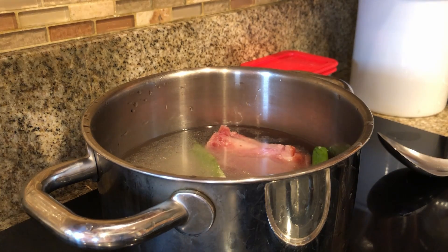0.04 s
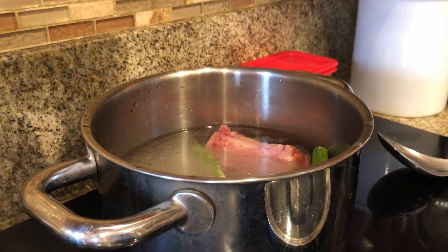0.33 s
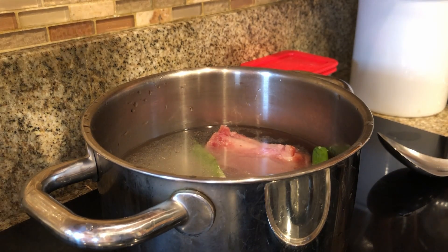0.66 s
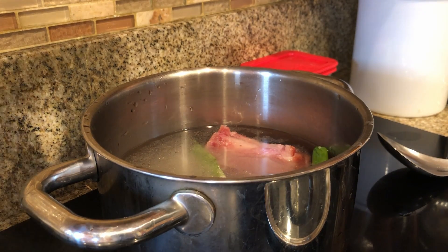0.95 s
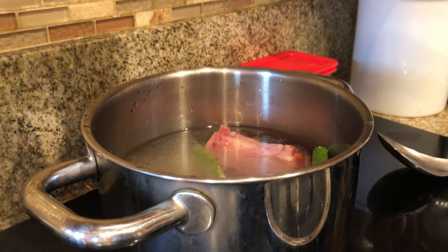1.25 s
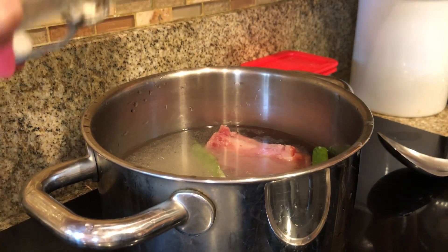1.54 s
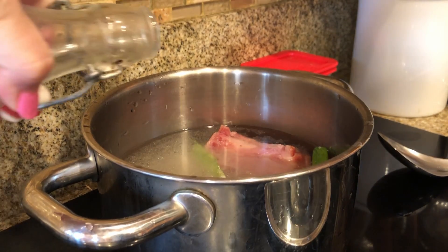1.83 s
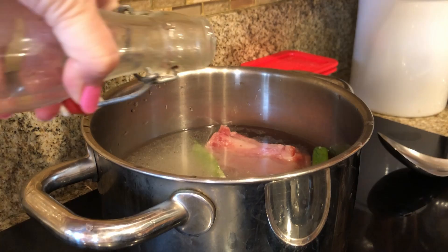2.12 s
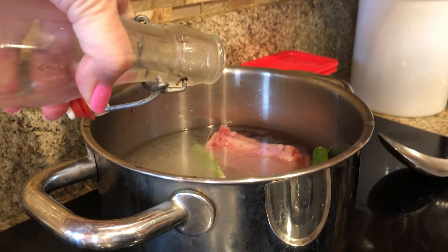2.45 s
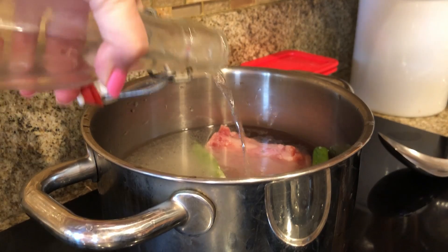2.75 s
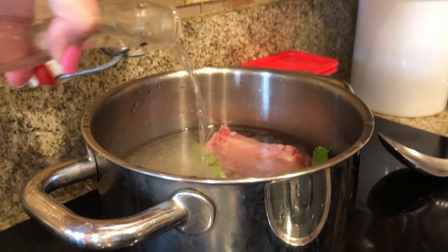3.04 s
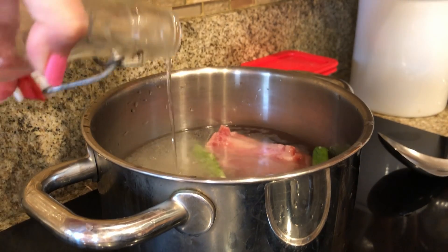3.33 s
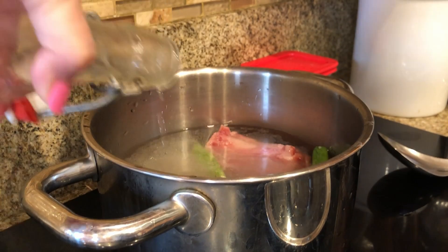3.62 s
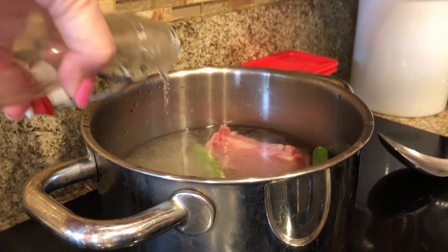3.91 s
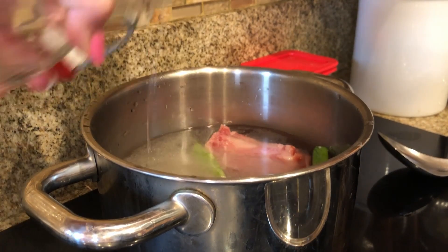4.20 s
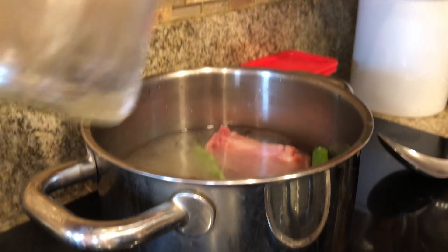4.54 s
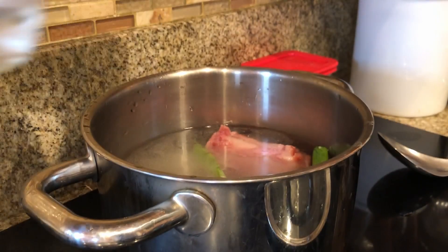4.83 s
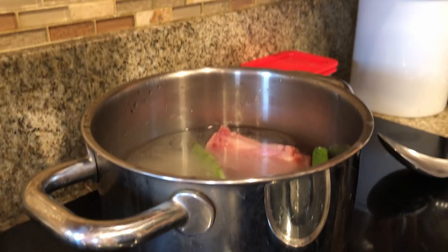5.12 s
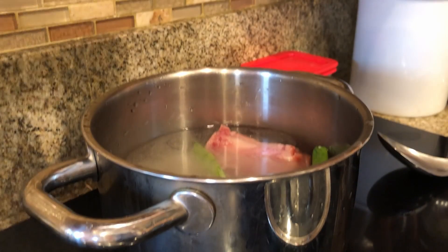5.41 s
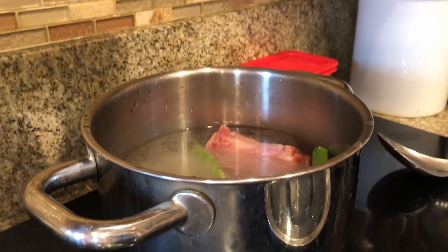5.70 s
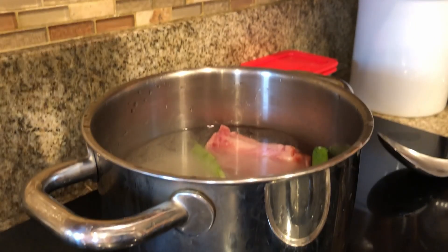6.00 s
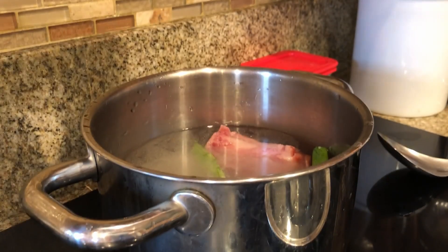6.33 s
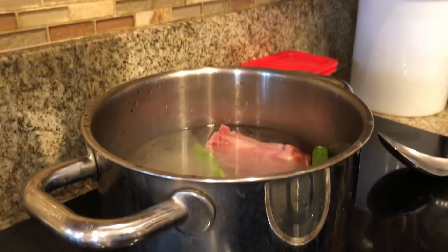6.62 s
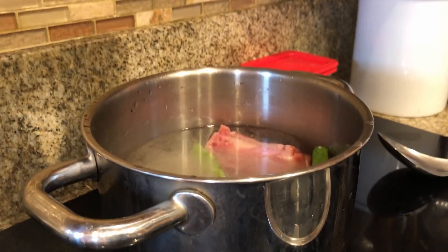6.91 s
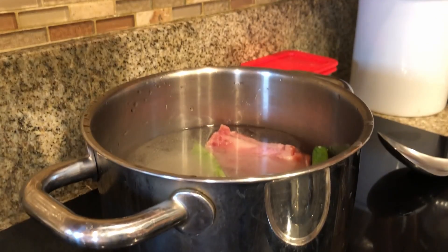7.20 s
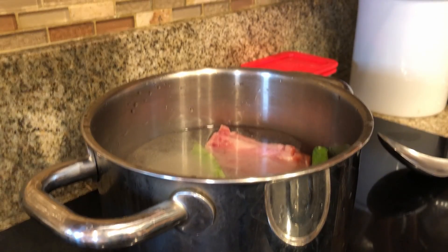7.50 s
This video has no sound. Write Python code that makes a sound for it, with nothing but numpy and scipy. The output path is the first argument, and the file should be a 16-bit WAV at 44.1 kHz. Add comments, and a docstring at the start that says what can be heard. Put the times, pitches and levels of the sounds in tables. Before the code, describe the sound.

Heard close in a small kitchen, a pot on the stove crackles and spits continuously over soft bubbling and a faint low rumble. Liquid briefly trickles in from a glass bottle, making a few small plinks. The sharp ticks then thin out into a smoother fizz, the bottle's wire clasp gives two metallic clicks, and the glass knocks and clinks down on a stone counter, settling with soft bumps.

```python
"""Trapped water spits and crackles in quick flurries as a steel pot heats on a glass hob:
tiny bubbles burst into a sizzle, droplets flash to steam and larger bubbles snap.
The water bubbles softly, and plinks and gurgles as a thin stream pours in from a swing-top glass bottle.
The wire bail clicks, then the bottle is set down on the stone counter and clinks.
The hob rumbles low underneath. Small kitchen, close perspective."""
import sys
import numpy as np
from scipy import signal
from scipy.fft import rfft, irfft
from scipy.io import wavfile

SR = 44100
rng = np.random.default_rng(int(sys.argv[2]) if len(sys.argv) > 2 else 0)


def store_pcm(level_fs):
    """Save levels as 16-bit WAV."""
    pcm = np.round(np.clip(level_fs, -1, 1) * 32767).astype(np.int16)
    wavfile.write(sys.argv[1], SR, np.atleast_2d(pcm).T)


N = 332997
TIME = np.arange(N) / SR

# Levels are relative: each layer sets its own gain on top.
# The ride of the hob's rumble. Each row: time in seconds, level in dB.
RUMBLE_RIDE = [(0.0, -69), (0.46, -58.5), (0.86, -68), (1.07, -52), (1.28, -70), (1.7, -56.5),
               (1.89, -65.5), (2.92, -65.5), (3.3, -60.5), (4.02, -67), (5.0, -62.5), (5.66, -67.5),
               (5.95, -55), (6.31, -64.5), (6.58, -59), (7.55, -57.5)]
# The rumble's tone. Each row: frequency in Hz, level in dB.
RUMBLE_EQ = [(20, -1.5), (40, 2.5), (70, 0.5), (130, -2.5), (200, -9.5), (300, -3.5), (430, -14.5),
             (1000, -21), (3000, -22.5), (16000, -22)]

# The wire bail hits the bottle neck. Each row: start in seconds, level in dB, hardness from 0 to 1.
BAIL_HITS = [(0.564, -19, 0.8), (0.599, -22.5, 1), (5.4241, -6.5, 0), (6.0881, -3.5, 0.97)]
# The wire's ring. Each row: pitch in Hz, dB when flicked softly, dB when snapped hard, t60 in seconds.
BAIL_RING = [(868, -47, -25, .05), (5300, -15, -26, .025), (5800, 1.5, -20, .035), (6660, -24, -18, .065),
             (9324, -18, -20, .05), (9810, -34, -21, .07), (11190, -22, -16, .055), (11370, -9, -10, .055),
             (12120, -17, -21, .04), (13270, -16, -20, .05), (13750, -19, -24, .04),
             (14220, -18, -21, .035)]
# The bail's bright crack. Each row: frequency in Hz, level in dB.
BAIL_CRACK_EQ = [(300, -18), (1500, -19.5), (2500, -4), (3300, -12.5), (5200, -11), (6700, -6),
                 (7900, -8.5), (9400, 1.5), (10200, -4), (11200, 3), (13000, -2.5), (15500, -12)]

# Glass clinks. Each row: start in seconds, level in dB, contact point from 0 (foot) to 1 (side).
BOTTLE_CLINKS = [(6.7652, -11, 0), (6.8755, -11.5, 0.71), (7.0545, -21.5, 0.77)]
# The glass ring. Each row: pitch in Hz, dB struck at the foot, dB struck on the side, t60 in seconds.
BOTTLE_RING = [(3928, -22, -1, .17), (4626, -1.5, -3, .2), (4680, -10, -8, .19), (4974, -17, -30, .12),
               (5375, -19, -28, .1), (6698, -15, -11, .11), (6840, -8, -20, .1), (7784, -18, -31, .09),
               (9012, -16, -27, .09), (9437, -3, -18, .095), (10380, -14, -28, .1), (12840, -13, -29, .07)]
# Knocks on the counter. Each row: start in seconds, level in dB, softness from 0 to 1.
COUNTER_KNOCKS = [(.544, -42, 0), (.566, -59, 0), (0.601, -42.5, 0), (3.797, -45, 0), (6.766, -9, 0.05),
                  (6.825, -26.5, 0.3), (6.873, -25, 0), (7.054, -31, 0.16), (7.185, -40.5, 1),
                  (7.2344, -21.5, 1), (7.2541, -17, 0.8), (7.343, -34, 0.94)]
# The counter under the bottle. Each row: pitch in Hz, dB hit hard, dB hit softly, t60 in seconds.
COUNTER_RING = [(775, -11, -7, .07), (870, -5, -6, .09), (1068, -7, -14, .09), (1280, -13, -24, .07),
                (1495, -5, -14, .07), (1630, -4, -12, .065), (1757, 0, -1, .05), (2100, -7, -13, .04),
                (2260, -6, -15, .04), (2690, -6, -21, .04), (3250, -12, -19, .035)]
# The crack of a knock. Each row: frequency in Hz, level in dB.
KNOCK_EQ = [(100, -42), (350, 0), (900, -11), (1800, 7.5), (2700, 0.5), (3600, 0.5), (7000, -8.5),
            (16000, -11.5)]
# The hollow thock of a soft contact. Each row: frequency in Hz, level in dB.
THOCK_EQ = [(200, -29), (600, -23.5), (850, 13), (1280, -18.5), (1740, -4), (2200, -72), (3400, -52),
            (8000, -38)]
# Dull handling bumps. Each row: start in seconds, level in dB, t60 in seconds.
HANDLING_BUMPS = [(0.585, -42, 0.1), (4.44, -39.5, 0.24), (4.847, -48.5, 0.19), (6.768, -40, 0.51),
                  (6.826, -35, 0.07), (6.955, -40.5, 0.12), (7.253, -38.5, 0.27)]
# A bump's dark tone. Each row: frequency in Hz, level in dB.
BUMP_EQ = [(30, -14), (70, -1.5), (130, -2), (200, -0.5), (300, -6), (600, -6.5), (1200, -13), (4000, -61)]

# The ride of the water's bubbling. Each row: time in seconds, level in dB.
GURGLE_RIDE = [(0, -74.5), (1, -69.5), (2.6, -71), (2.85, -56), (3.3, -65.5), (4.4, -64.5), (7.55, -56)]
# Short pitched rings: the wire bail's ping at 0.6 s, then single bubbles in the water.
# Each row: start in seconds, level in dB, opening pitch in Hz.
SHORT_RINGS = [(.602, -33.5, 2080), (2.25, -41.5, 650), (2.799, -42.5, 870), (2.825, -44, 1500),
               (2.911, -40.5, 2290), (2.919, -36, 2630), (2.959, -42, 2980), (2.975, -35.5, 5570),
               (3.003, -37, 5070), (3.003, -38, 3050), (3.116, -36, 4760), (3.287, -45, 1570),
               (4.103, -42, 1840)]

# Larger bubbles bursting. Each row: start in seconds, level in dB.
BUBBLE_SNAPS = [(0.6319, -12), (0.7032, -15), (0.9352, -12), (1.1347, -16), (1.2016, -11), (1.5338, -14),
                (1.6027, -15), (1.7897, -14), (1.8708, -9), (1.9608, -16), (1.9898, -19), (2.2237, -10),
                (2.371, -4), (2.5919, -15), (2.6822, -9), (3.3178, -12), (3.3926, -14), (3.7957, -9),
                (4.1269, -11), (4.326, -12), (4.7799, -13), (6.1798, -9)]
# Droplets flashing to steam. Each row: start in seconds, level in dB, t60 in seconds.
STEAM_SPITS = [(0.031, -40, 0.057), (0.265, -36.5, 0.17), (0.395, -35, 0.063), (0.537, -28, 0.3),
               (0.562, -27, 0.06), (0.703, -31.5, 0.39), (0.901, -34.5, 0.36), (0.972, -29.5, 0.16),
               (1.05, -28, 0.1), (1.199, -27.0, 0.18), (1.239, -29, 0.34), (1.653, -32.5, 0.14),
               (1.69, -35, 1.1), (1.862, -33, 0.27), (1.99, -38.5, 2), (2.222, -30, 0.4),
               (2.311, -31, 0.33), (2.591, -35.5, 0.099), (2.627, -28, 0.72), (2.834, -28, 0.084),
               (3.133, -31.5, 0.48), (3.39, -27.5, 0.33), (3.543, -33.5, 0.29), (3.675, -33, 0.16),
               (3.792, -32, 0.29), (4.005, -24.0, 0.079), (4.039, -25, 0.24), (4.324, -25.5, 0.34),
               (4.448, -29.5, 0.2), (4.495, -25.5, 0.1), (4.771, -32.5, 0.59), (4.849, -21.5, 0.14),
               (5.101, -23, 0.075), (5.219, -29, 0.55), (5.392, -32.5, 0.63), (5.72, -35, 0.44),
               (5.776, -24, 0.24), (6.003, -25, 0.055), (6.028, -30, 0.7), (6.178, -28, 0.065),
               (6.329, -31.5, 0.15), (6.419, -23.5, 0.24), (6.517, -28.5, 0.08), (6.644, -32.5, 0.16),
               (6.954, -23, 0.2), (7.378, -25, 0.37)]
# The bed of sizzle under the spits. Each row: time in seconds, level in dB.
SIZZLE_RIDE = [(0.0, -53), (0.13, -55), (0.5, -43.5), (0.68, -44), (0.9, -37), (1.17, -45), (1.4, -41.5),
               (1.97, -53.0), (2.4, -41), (2.56, -42.5), (2.8, -36.5), (3.1, -40.5), (3.65, -37),
               (4.6, -41.0), (5.2, -42), (5.35, -36), (6.3, -41.5), (7.55, -42)]
# How far bubble ticks stand out; the sputter partly follows. Each row: time in seconds, level in dB.
TICK_RIDE = [(0, 1), (.7, 1), (4.62, -0.5), (5.6, -17.5), (7.55, -54)]
# The bright tone of sizzle and snaps. Each row: frequency in Hz, level in dB.
CRACKLE_EQ = [(250, -21.5), (450, -17.5), (850, -11.5), (1200, -16), (2200, -14.5), (3800, -13.5),
              (4700, -9), (5600, -6.5), (7100, -4), (8400, -6), (9900, -0.5), (12000, 0.9), (13800, 0.5),
              (15500, -4)]


def from_db(db):
    return 10 ** (np.asarray(db) / 20)


def ride(rows):
    """A fader move: rows of (seconds, dB) joined by straight lines."""
    return np.interp(TIME, *np.transpose(rows))


def add(out, s, sound):
    """Mix a sound in at s seconds."""
    start = min(max(round(s * SR), 0), N)
    out[start:start + len(sound)] += sound[:N - start]


def colour(x, eq, size=4096):
    """Shape a sound with a minimum-phase EQ of unit energy, so nothing rings ahead of an attack."""
    hz, db = np.transpose(eq)
    gain = from_db(np.interp(np.log(np.fft.rfftfreq(size, 1 / SR) + 1), np.log(hz), db))
    cepstrum = irfft(np.log(gain))[:size // 2]
    pulse = irfft(np.exp(rfft(2 * cepstrum, size)))
    return signal.oaconvolve(x, pulse / np.linalg.norm(pulse))[:N]


def noise(eq):
    """Coloured noise, rms near 1."""
    return colour(rng.standard_normal(N), eq)


def swell(rise, t60):
    """One second of envelope: a straight attack, then an exponential decay."""
    t = TIME[:SR]
    return np.minimum(t / rise, 1) * from_db(-60 * np.maximum(t - rise, 0) / t60)


def bursts(rows):
    """Envelope of events whose powers sum. Each row: start, dB, rise, t60, with times in seconds."""
    power = np.zeros(N)
    for s, db, rise, t60 in rows:
        add(power, s, (from_db(db) * swell(rise, t60)) ** 2)
    return np.sqrt(power)


def grains(per_s, spread_db):
    """Random clicks of uneven size, mean power near 1 at any rate."""
    sizes = from_db(spread_db * np.minimum(rng.exponential(1, N), 4))
    sizes /= np.sqrt(np.mean(sizes ** 2))
    chance = np.minimum(per_s / SR, 1)
    return sizes * rng.choice([-1, 1], N) * (rng.random(N) < chance) / np.sqrt(chance)


def strike(hits, modes, rise):
    """Each hit rings every mode, blending between two ways of striking."""
    out = np.zeros(N)
    for s, db, blend in hits:
        for hz, first_db, second_db, t60 in modes:
            tone = np.sin(2 * np.pi * (hz * TIME[:SR] + rng.random()))
            gain = from_db(db + first_db + blend * (second_db - first_db))
            add(out, s, gain * swell(rise, t60) * tone)
    return out


def bubbles(per_s, spread_db, low_hz, high_hz, cycles, count):
    """A cloud of bubbles in `count` sizes, each dying by 60 dB over `cycles` cycles."""
    out = np.zeros(N)
    for hz in np.geomspace(low_hz, high_hz, count):
        decay = from_db(-60 * hz / (cycles * SR))
        angle = 2 * np.pi * hz / SR
        gain = np.sqrt((1 - decay ** 2) / 2)
        kicks = grains(per_s / count, spread_db) + 1e-18 * TIME  # the tiny ramp avoids denormals
        out += signal.lfilter([gain, 0, -gain], [1, -2 * decay * np.cos(angle), decay ** 2], kicks)
    return out / np.sqrt(count)


def hob_rumble(gain_db=4, waver_db=2, wavers_per_s=9):
    """The hob's low end swells, sinks and wavers."""
    waver = np.interp(TIME * wavers_per_s, np.arange(400), rng.standard_normal(400))
    return from_db(ride(RUMBLE_RIDE) + gain_db + waver_db * waver) * noise(RUMBLE_EQ)


def kitchen(x, t60, wet_db=-15.5):
    """Close walls return a short, dense tail."""
    tail = swell(.016, t60) * rng.standard_normal(SR)
    return x + from_db(wet_db) * signal.oaconvolve(x, tail / np.linalg.norm(tail))[:N]


def wire_bail(soft_crack_db=-12, hardness_db=9):
    """The wire rings briefly against the neck; a harder snap brings more bright crack."""
    crack = bursts([(s, db + soft_crack_db + hardness_db * hard, .0022, .036)
                    for s, db, hard in BAIL_HITS])
    return strike(BAIL_HITS, BAIL_RING, rise=.0028) + crack * noise(BAIL_CRACK_EQ)


def bottle(crack_db=-1, thock_db=2):
    """Glass meets stone: a hard crack or a soft thock, the ring of counter and glass, a dull bump."""
    crack = bursts([(s, db + crack_db - 8 * soft, .002, .04) for s, db, soft in COUNTER_KNOCKS])
    thock = bursts([(s, db + thock_db - 12 * (1 - soft), .0015, .024) for s, db, soft in COUNTER_KNOCKS])
    contact = crack * noise(KNOCK_EQ) + thock * noise(THOCK_EQ)
    counter = from_db(-4) * strike(COUNTER_KNOCKS, COUNTER_RING, rise=.00057)
    bump = bursts([(s, db, .006, t60) for s, db, t60 in HANDLING_BUMPS]) * noise(BUMP_EQ)
    glass = strike(BOTTLE_CLINKS, BOTTLE_RING, rise=.00095)
    return glass + contact + counter + bump


def gurgle():
    """Water bubbles softly as it boils throughout, and gurgles more while the stream pours in."""
    level = from_db(ride(GURGLE_RIDE))
    per_s = 400 * level / from_db(-63)
    return level * bubbles(per_s, spread_db=3.8, low_hz=652, high_hz=5330, cycles=26, count=16)


def plinks(gain_db=1.1, rise=.00072, t60=.037, climb_per_s=1.1):
    """Short rings that climb in pitch: one ping of the bail, then bubbles nearing the surface."""
    out = np.zeros(N)
    for s, db, hz in SHORT_RINGS:
        pitch = hz * (1 + climb_per_s * np.minimum(TIME[:SR], t60))
        tone = np.sin(2 * np.pi * np.cumsum(pitch) / SR)
        add(out, s, from_db(db + gain_db) * swell(rise, t60) * tone)
    return out


def snaps(gain_db=3.5, low_cut_hz=1800, delay_s=.0012):
    """A larger bubble bursts with one thin crack, scattered briefly by the pot wall."""
    clicks = np.zeros(N)
    scatter = from_db(-11) * swell(.0001, .002) + from_db(-24) * swell(.001, .018)
    for s, db in BUBBLE_SNAPS:
        crack = scatter * rng.standard_normal(SR)
        crack[0] = 1  # the direct crack leads, the scatter follows
        add(clicks, s + delay_s, from_db(db + gain_db) * crack)
    low_cut = signal.butter(1, low_cut_hz, "high", fs=SR, output="sos")
    return colour(signal.sosfilt(low_cut, clicks), CRACKLE_EQ)


def sputter(per_s=22, level_db=7, spread_db=8.5, rise=.006, t60=.027, tick_follow=.36):
    """Envelope of small random spits, relative to the sizzle bed; they recede as the ticks fade."""
    gap_draws, level_draws = rng.random((400, 2)).T
    starts = np.cumsum(-np.log(1 - gap_draws)) / per_s
    levels = level_db + spread_db * (2 * level_draws - 1)
    envelope = bursts([(s, db, rise, t60) for s, db in zip(starts, levels) if s < TIME[-1]])
    return envelope * from_db(tick_follow * ride(TICK_RIDE))


def spit_onset(s, reach_s=.008, snapped_rise=.0005, free_rise=.006):
    """Start and attack of a spit: abrupt and locked to a nearby snap if one sets it off."""
    snap_s = min((at for at, _ in BUBBLE_SNAPS), key=lambda at: abs(at - s))
    return (snap_s, snapped_rise) if abs(snap_s - s) < reach_s else (s, free_rise)


def boiling(bed_db=-.5, lift_db=.5, lift_s=.02):
    """Envelope of the boil: a sputtering bed lifts a touch before each spit flares and fizzes away."""
    bed = from_db(ride(SIZZLE_RIDE) + bed_db) * np.hypot(1, sputter())
    lift, flares = np.zeros(N), []
    for s, db, t60 in STEAM_SPITS:
        start, rise = spit_onset(s)
        add(lift, start - lift_s, np.linspace(0, lift_db, int(lift_s * SR)))
        flares.append((start, db, rise, t60))
    return np.hypot(bed * from_db(lift), bursts(flares))


def sizzle(fizz_per_s=5000, ticks_per_s=260, steam_per_s=9000, typical_db=-39, steam_growth=.082):
    """Tiny bubbles burst; a spit brings more of them, until they merge into a broad hiss of steam."""
    level = boiling()
    vigour = level / from_db(typical_db)  # scales all three rates
    fizz = bubbles(fizz_per_s * vigour, spread_db=8, low_hz=4030, high_hz=15400, cycles=25, count=12)
    ticks = bubbles(ticks_per_s * vigour, spread_db=2.5, low_hz=5620, high_hz=16200, cycles=6.6, count=6)
    steam = vigour ** steam_growth * grains(steam_per_s * vigour, spread_db=3)
    texture = from_db(-8.5) * fizz + from_db(ride(TICK_RIDE) - 5) * ticks + from_db(-2.68) * steam
    return colour(level * texture, CRACKLE_EQ)


def scene():
    """Mono mix: the pot tight and close, the bottle with more room, the rumble dry underneath."""
    pot = kitchen(sizzle() + snaps() + plinks() + gurgle(), t60=.036)
    handling = kitchen(bottle() + wire_bail(), t60=.26)
    return (pot + handling + hob_rumble())[None]


def record(dry, cutoff_hz=15700):
    """Peaks past full scale clip, then a steep filter cuts the top."""
    high_cut = signal.ellip(12, .1, 70, cutoff_hz, fs=SR, output="sos")
    return signal.sosfilt(high_cut, np.clip(dry, -1, 1))


dry = scene()
out = record(dry)
store_pcm(out)
```